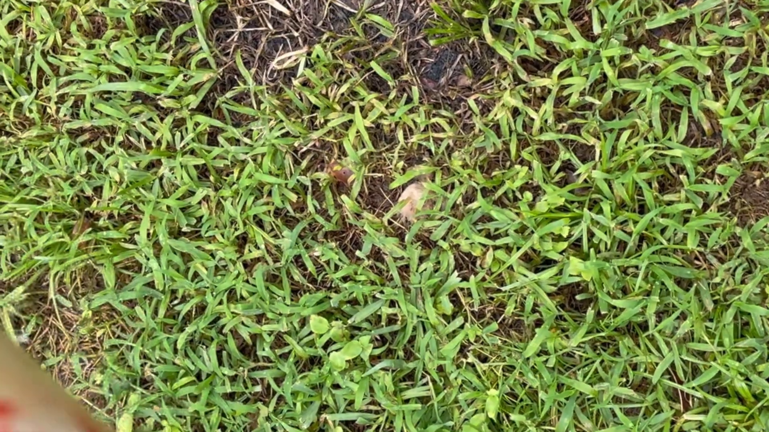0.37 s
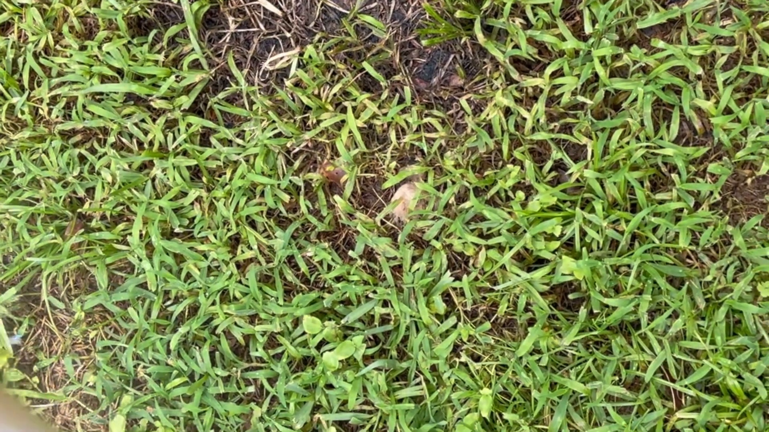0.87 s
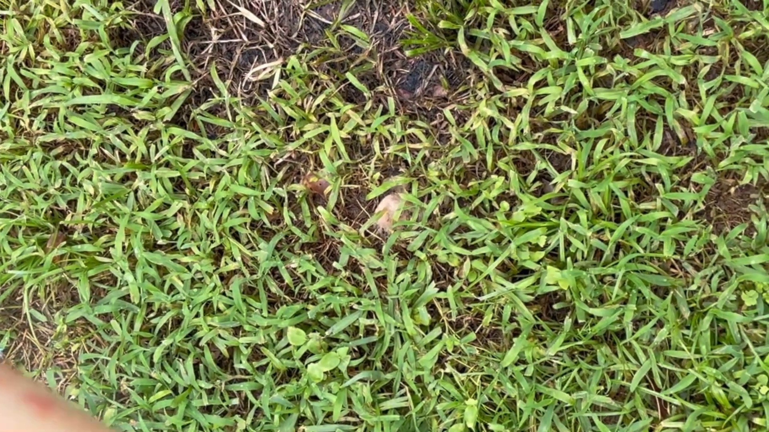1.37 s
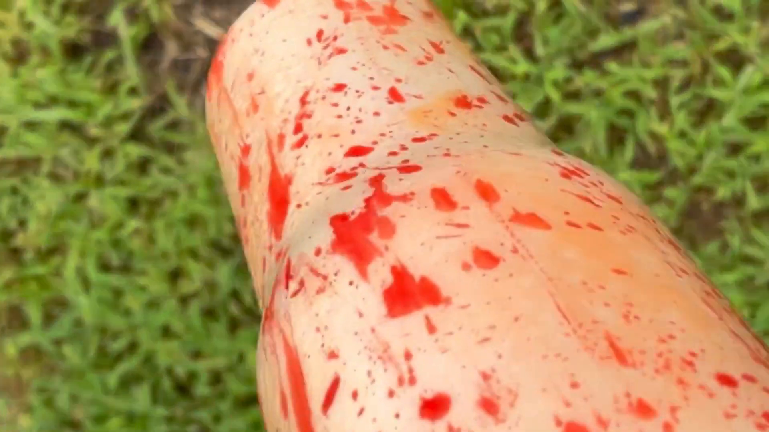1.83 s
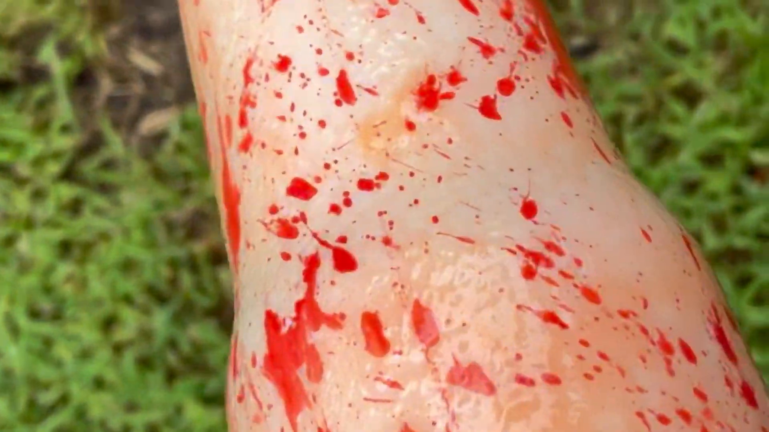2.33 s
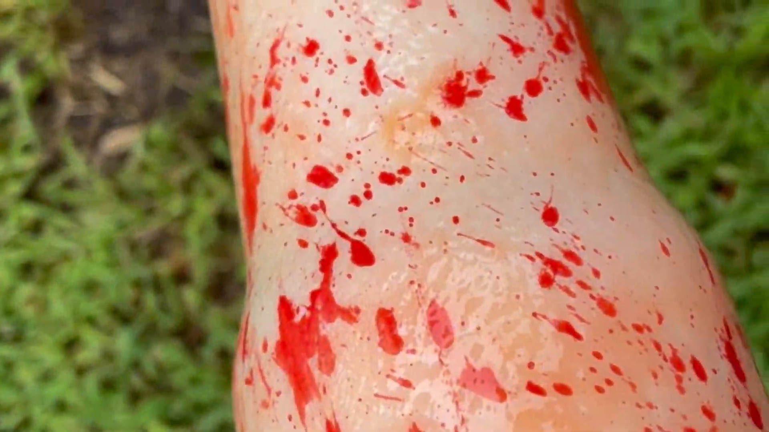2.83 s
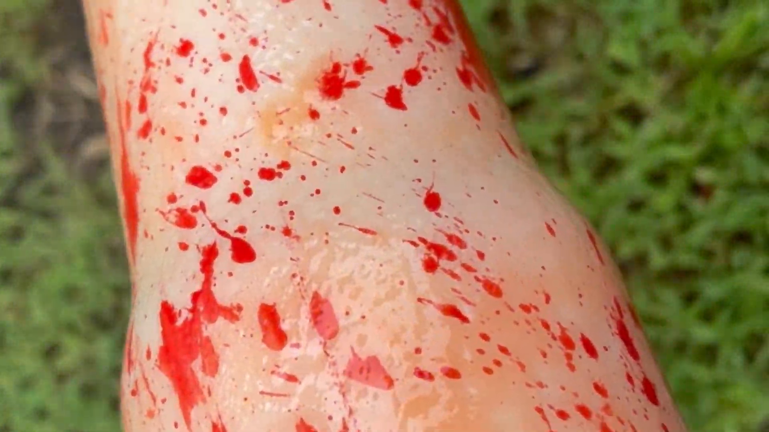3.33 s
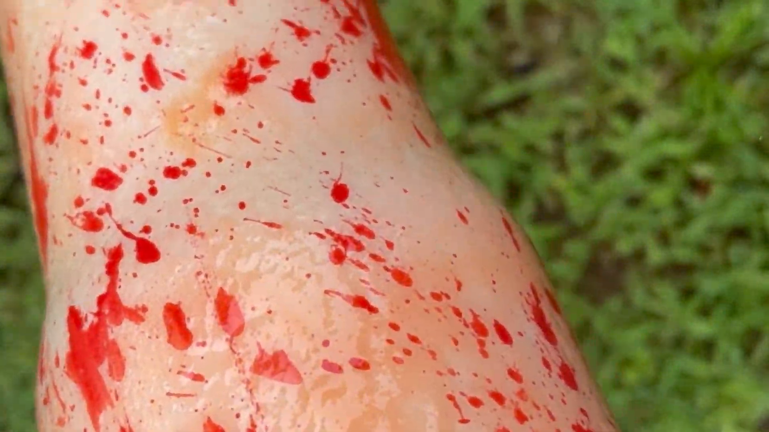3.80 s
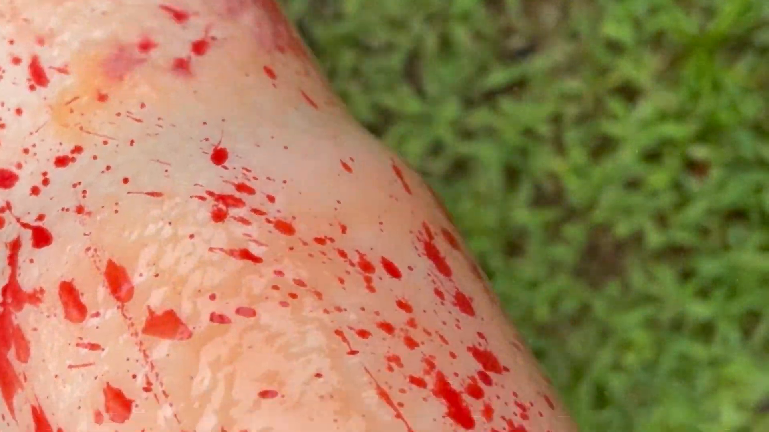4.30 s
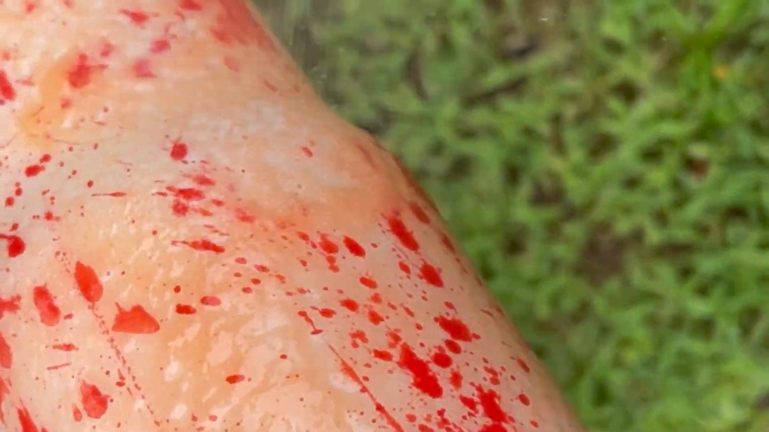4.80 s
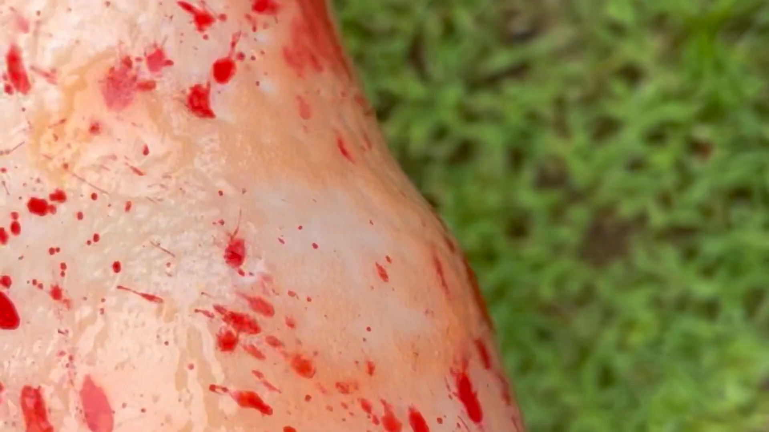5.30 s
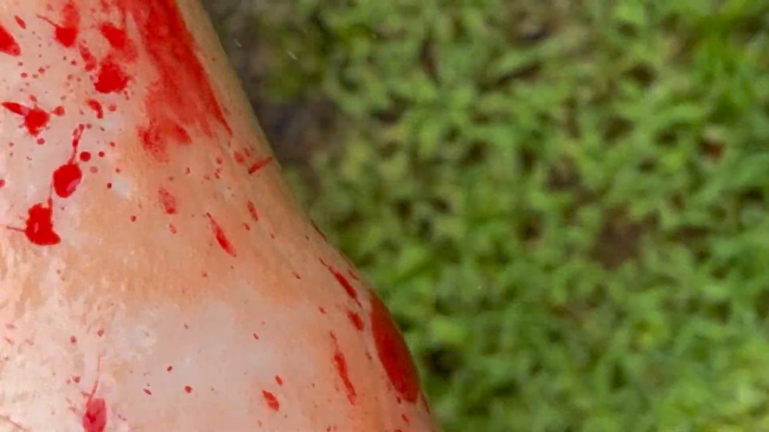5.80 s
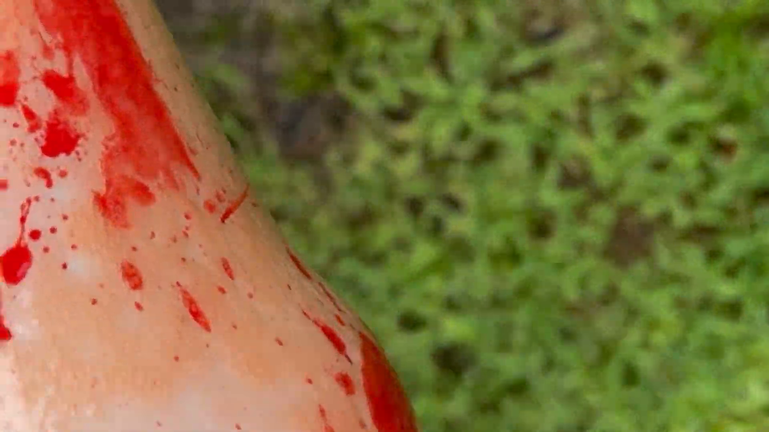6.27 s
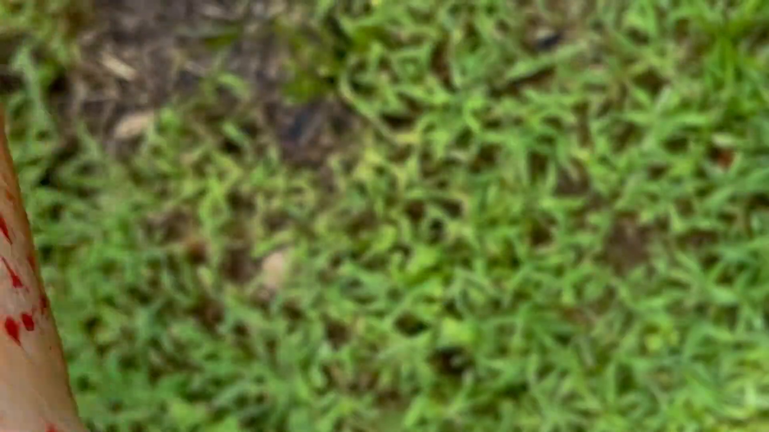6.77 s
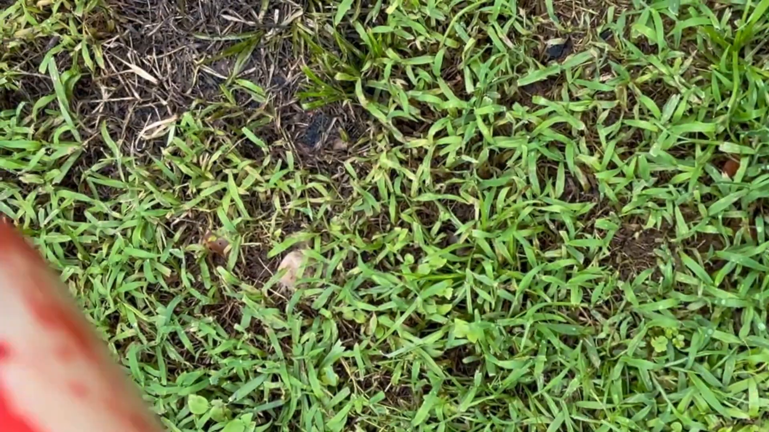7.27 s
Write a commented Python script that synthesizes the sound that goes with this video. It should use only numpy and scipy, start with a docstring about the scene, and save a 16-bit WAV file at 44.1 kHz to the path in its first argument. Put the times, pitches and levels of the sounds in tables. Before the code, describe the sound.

Outdoors on a lawn, an aerosol can sprays close to a small stereo microphone. Two brief hisses come first, then three longer ones, the fourth loudest and swinging in level. Small finger ticks and a faint fizz fill the gaps. After the fifth, skin rubs on the can and it is knocked once with a hollow tinny clack; a sixth burst is still hissing at the end. Far traffic rumbles softly.

```python
"""Outdoors over a lawn, far traffic rumbles under a steady wash, and a faint fizz of filtered noise is in the air.
A finger ticks on the nozzle, then an aerosol can sprays at a held object, close to a small stereo microphone:
six short bursts of turbulent hiss, with moving echoes from hand, can and object, and moving dips. Fizz lingers
after each of the first five; ticks, rubs, decaying sines and soft bumps fall around them. After the fifth the can
is knocked once, a noise crack with decaying sine modes; the sixth burst is still spraying at the end."""
import sys
import numpy as np
from scipy import signal
from scipy.fft import rfft, irfft
from scipy.io import wavfile
from scipy.ndimage import uniform_filter1d

SR = 44100
rng = np.random.default_rng(int(sys.argv[2]) if len(sys.argv) > 2 else 0)


def unload_audio(sound):
    """Save the sound as a 16-bit wav file, at the path given as the first command line argument."""
    columns = np.transpose(np.atleast_2d(sound))
    # keep every value between -1 and 1, then stretch to whole-number steps
    steps = np.round(np.clip(columns, -1, 1) * 32767)
    wavfile.write(sys.argv[1], SR, steps.astype(np.int16))


def voltage_ratio(decibels):
    """Convert decibels (scalar or array-like) to amplitude ratios, 20 dB per decade."""
    exponent = np.asarray(decibels, float) / 20
    return 10 ** exponent


N = 336438
TIME, HZ = np.arange(N) / SR, np.fft.rfftfreq(512, 1 / SR)

# nozzle valve, one row a burst: opens t/s, rise t/ms, shuts t/s, fall t60/ms
VALVE = [(.133, 14, .832, 60), (1.04, 12, 1.466, 55), (2.868, 16, 3.712, 22), (3.99, 6, 4.882, 45),
         (5.288, 12, 6.393, 40), (7.28, 11, 7.7, 50)]
# loudness of the jet as the can swings nearer and away, before a common +4 dB; one table a burst: t/s, level/dB
SWING = [
    [(0.165, -30), (0.401, -29.5), (0.437, -27.5), (0.445, -28.5), (0.563, -30), (0.573, -28.5),
     (0.82, -29.5)],
    [(1.07, -30.5), (1.12, -28.5), (1.352, -30), (1.455, -30)],
    [(2.9, -30), (2.988, -26), (3.306, -27.5), (3.314, -26), (3.618, -27), (3.638, -29.5), (3.7, -27.5)],
    [(4.01, -29.5), (4.06, -23), (4.302, -25.5), (4.496, -21), (4.678, -27.5), (4.774, -23), (4.87, -25)],
    [(5.32, -34.5), (5.324, -29), (5.652, -29.5), (5.756, -26), (5.892, -29.5), (6.024, -27.5), (6.38, -29)],
    [(7.31, -30), (7.362, -28.5), (7.62, -27)],
]
# aim of each burst before swing and waver: splash on the object level/dB, splash tilt/(dB per octave),
# topmost hiss level/dB, left minus right of the low hiss level/dB, scatter that makes the ports differ/0-1
AIM = [(0, -2.1, 5, 5.5, 0.23), (0.9, -1.5, 0, 3, 0.07), (3, 2, 1.5, -.3, 0.07),
       (-0.1, -0.5, -1.5, 0.5, 0.03), (0, 2, -0.5, -.3, 0.53), (-1.3, -2.8, 0, 1.5, 0.3)]
# the two microphone ports: f/Hz, phase by which left leads/rad
PORT_LEAD = [(30, 0), (300, -.15), (850, 1.2), (1700, -.1), (4800, .2), (5400, -1), (6100, -1.7),
             (11500, -2.1), (12500, -2.6), (15500, -3)]
# left-right likeness of the yard's wash and the fizz: f/Hz, likeness/0-1
YARD_SAME = [(60, 0.93), (270, 1), (450, 0.61), (800, 0.11), (1300, 0.12), (2000, 0.81), (3300, 0.68),
             (5000, .6), (8000, 0.47)]


def evened(x):
    """Scales to an rms of 1."""
    return x / np.sqrt(np.mean(np.abs(x) ** 2) + 1e-20)


def read(points, hz=HZ):
    """Reads a table along log frequency, as a column."""
    f, value = np.transpose(points)
    return np.interp(np.log(hz + 1), np.log(f + 1), value)[:, None]


def follow(tables, t):
    """Reads the columns of tables laid end to end at times t."""
    s, *columns = np.vstack(tables).T
    return [np.interp(t, s, column) for column in columns]


def add(mix, s, sound):
    """Lays a sound into the mix at s seconds, cut at the end."""
    part = mix[round(s * SR):][:len(sound)]
    part += sound[:len(part)]


def drift(t, size, count=1):
    """Slow chance of rms 1, smoothed twice over size steps."""
    x = rng.standard_normal((len(t), count))
    for _ in range(2):
        x = uniform_filter1d(x, int(size), axis=0)
    return evened(x).T


def hiss(shape, same, patchy_db, left_db=0., scatter=0., size=512):
    """Random short-time spectra with drifting patches, heard through the two microphone ports."""
    hz, frames = np.fft.rfftfreq(size, 1 / SR), 4 * N // size + 5
    a, b, c, d, patches = rng.standard_normal((frames, len(hz), 5)).T
    patches = uniform_filter1d(patches, size=size // 100, axis=0)
    patches = evened(uniform_filter1d(patches, size=12288 // size, axis=1))
    like = np.clip(read(same, hz) - scatter, 0, 1)
    left, unlike = a + 1j * b, c + 1j * d
    right = like * left + np.sqrt(1 - like ** 2) * unlike
    right = right * np.exp(-1j * read(PORT_LEAD, hz))
    ports = np.array([left * voltage_ratio(left_db / 2), right / voltage_ratio(left_db / 2)])
    spectra = ports * shape * voltage_ratio(patchy_db * patches)
    return evened(signal.istft(spectra, nperseg=size, noverlap=3 * size // 4)[1][:, :N])


def resonant_noise(hz, q, count):
    """White noise through one broad resonance, at rms 1."""
    return evened(signal.lfilter(*signal.iirpeak(hz, q, SR), rng.standard_normal(count)))


def wash():
    """Steady outdoor wash: shaped noise, unlike at the two ports in much of its range."""
    # spectrum: f/Hz, relative level/(dB per Hz)
    spectrum = [(150, -10), (250, -6), (455, -12), (480, -22), (506, -11.5), (578, -13), (634, -11),
                (861, -19.5), (1430, -27.5), (6000, -43.5), (7800, -75), (13200, -120)]
    return voltage_ratio(-55) * hiss(voltage_ratio(read(spectrum)), YARD_SAME, 0.93)


def traffic():
    """Far rumble: low noise, in finer bands, whose level wanders and is lumpy by chance."""
    # spectrum: f/Hz, relative level/(dB per Hz)
    spectrum = [(12, -41), (20, -53), (44, -6.5), (70, 1.5), (102, -4.5), (155, -4.5), (200, -15.5),
                (236, -16), (300, -26.5), (390, -63), (660, -120)]
    # left-right likeness: f/Hz, likeness/0-1
    alike = [(30, .92), (300, .9)]
    # level course, before the lumps and a common +0.88 dB: t/s, level/dB
    course = [(0.0, -46), (2.61, -43), (4.04, -46), (4.12, -37.5), (4.16, -40.5), (5.18, -44),
              (5.23, -34.5), (5.31, -49), (5.35, -37.5), (5.72, -48), (6.01, -41.5), (6.16, -47),
              (7.59, -41.5), (7.63, -51)]
    low = hiss(voltage_ratio(read(spectrum, np.fft.rfftfreq(4096, 1 / SR))), alike, 1.0, size=4096)
    lumps_db = 0.95 * drift(TIME, 0.067 * SR)[0]
    return low * voltage_ratio(follow([course], TIME)[0] + lumps_db + 0.88)


def bumps():
    """Bumps of wind or hand on the microphone: about two turns of a low sine that swells and fades."""
    # bumps: t/s, peak level/dB, f/Hz
    thumps = [(1.99, -31, 68), (4.101, -27.5, 75), (5.211, -34, 176), (5.219, -25.5, 65.6),
              (5.351, -28, 65), (6.988, -31, 67)]
    out = np.zeros(N)
    for s, db, hz in thumps:
        turns = np.arange(0, 2.2, hz / SR)
        add(out, s - 1 / hz, voltage_ratio(db) * np.hanning(len(turns)) * np.sin(2 * np.pi * turns))
    return out


def fizz():
    """Faint fine hiss left over after a burst, probably the wet coat and the dripping nozzle."""
    # fizz from the outset, then after five bursts: start t/s, level/dB, fading/(dB per s), tilt/(dB per octave)
    drips = [(0, -59.5, -3, 7.5), (.832, -62, 3, 5.5), (1.466, -60, 4, 4.5), (3.712, -57, 8, 6),
             (4.882, -52, 12.5, 8.5), (6.393, -62, 1, 7)]
    # spectrum before the tilt: f/Hz, relative level/(dB per Hz)
    spectrum = [(880, -47), (1500, -17.5), (1960, -2), (2200, -25), (2370, -23), (2920, -6), (3400, -13),
                (5110, -18.5), (7500, -3), (11000, -14.5), (14300, -40.5), (22000, -120)]
    t, f = np.arange(N // 128 + 5) * 128 / SR, HZ[:, None]
    rows = np.array(drips)
    latest = np.maximum(np.searchsorted(rows[:, 0], t) - 1, 0)
    starts, start_db, fade_db, tilt_db = rows[latest].T
    age = np.maximum(t - starts, 0)
    level_db = start_db - fade_db * age
    # the treble edge is set from the level; after a burst it starts higher and draws back
    edge_hz = 10908 + 90 * (level_db + 58.5) + 1200 * np.exp(-age / 0.13) * (starts > 0)
    shape = voltage_ratio(read(spectrum) + tilt_db * np.log2((f + 1) / 8000))
    shape = shape / (1 + np.exp((f - edge_hz) / 110))
    shape = shape / np.sqrt(np.mean(shape ** 2, axis=0))
    return hiss(shape, YARD_SAME, 1.2) * voltage_ratio(np.interp(TIME, t, level_db))


def ticks(out, t):
    """Fingers on nozzle and can: short puffs of noise with a broad ring."""
    # ticks before a common factor of 0.58: t/s, starting noise level/dB, ring f/Hz
    touches = [(0.066, -37, 8000), (1.7848, -46, 3950), (1.8047, -45, 5030), (1.819, -43, 3960),
               (1.9939, -48, 7100), (1.6, -55, 4000), (2.36, -56, 3400), (2.7324, -48.5, 7300),
               (2.8214, -44, 9180), (3.7983, -41, 8000), (3.933, -43, 7710), (3.9584, -42, 9990),
               (4.932, -38, 5000), (6.4054, -40, 10200), (6.665, -54, 7160), (6.7064, -51, 7850),
               (6.8156, -51, 4000), (7.1446, -38.5, 8550)]
    t60_ms = 10.7
    for s, db, hz in touches:
        add(out, s, 0.58 * voltage_ratio(db - 60000 * t / t60_ms) * resonant_noise(hz, 1.6, len(t)))


def rubs(out, t):
    """Skin sliding on the can: noise around 5500 Hz that swells and fades."""
    # rubs: t/s, noise level at the height of the swell/dB, length t/ms
    rustles = [(1.74, -66, 100), (1.78, -61, 50), (6.8, -62, 130), (6.845, -55, 18), (6.868, -53, 23),
               (6.9, -57, 31), (6.931, -74, 170), (6.999, -58, 54)]
    for s, db, ms in rustles:
        swell = np.sin(np.pi * np.minimum(t * 1000 / ms, 1))
        add(out, s, voltage_ratio(db) * resonant_noise(5500, .7, len(t)) * swell)


def decaying_sines(out, t):
    """Single decaying sines with a 1.2 ms onset: rings with the ticks, and a burble during the fifth burst."""
    # sines: t/s, level before onset and decay/dB, f/Hz, t60/ms
    sines = [(.066, -50, 1950, 34), (0.066, -36, 7000, 28), (1.785, -53, 1150, 34),
             (1.806, -53.5, 1170, 50), (1.82, -46.5, 1140, 41), (1.994, -54, 3780, 23),
             (2.36, -61.5, 3350, 25), (3.932, -40, 7740, 34), (6.11, -41.5, 1134, 220)]
    for s, db, hz, t60_ms in sines:
        onset = np.minimum(t / 0.0012, 1)
        add(out, s, voltage_ratio(db - 60000 * t / t60_ms) * np.sin(2 * np.pi * hz * t) * onset)


def knock(out, t):
    """One knock on the can: a bright crack, then the modes of the tin and a thud build up and die."""
    # the knock before onset and decay: t/s, crack level/dB, ring level/dB, thud level/dB
    blow = (6.8945, -27, -39, -40)
    # modes of the tin, relative to the ring level: f/Hz, level/dB, t60/s
    modes = [(357.5, 6.5, 0.14), (754, 0.5, 0.13), (980, 9.5, 0.063), (1170, -8, 0.076), (1950, 2, 0.035),
             (3871, -14, .04), (6840, 14.5, 0.034), (9400, -12, .03)]
    s, crack_db, ring_db, thud_db = blow
    tin = sum(voltage_ratio(db - 60 * t / t60) * np.sin(2 * np.pi * hz * t) for hz, db, t60 in modes)
    crack = np.diff(rng.standard_normal(len(t) + 1))  # differencing brightens the noise
    crack = crack * voltage_ratio(crack_db - 60 * t / 0.041) * np.minimum(t / 0.00055, 1)
    thud = resonant_noise(650, .9, len(t)) * voltage_ratio(thud_db - 60 * t / 0.065)
    add(out, s, crack + (voltage_ratio(ring_db) * tin + thud) * (1 - np.exp(-t / 0.0062)))


def handling():
    """The small sounds, low-passed at 10500 Hz; the right port hears them with a shifted phase."""
    out, t = np.zeros(N), np.arange(8000) / SR
    for small_sound in (ticks, rubs, decaying_sines, knock):
        small_sound(out, t)
    out = signal.sosfilt(signal.butter(12, 10500, fs=SR, output="sos"), out)
    lead = read(PORT_LEAD, np.fft.rfftfreq(N, 1 / SR))[:, 0]
    return np.array([out, irfft(rfft(out) * np.exp(-1j * lead), N)])


def valve():
    """Flow through the nozzle, 0-1: a weak start that swells fast, and a quick fall once the finger lifts."""
    flow = np.zeros(N)
    for opens, rise_ms, shuts, fall_ms in VALVE:
        rise = np.clip((TIME - opens) * 1000 / rise_ms, 0, 1) ** 1.5
        flow += rise * voltage_ratio(-60000 * np.maximum(TIME - shuts, 0) / fall_ms)
    return flow


def burst_at(t):
    """Number of the burst at each time; a burst's settings take over 50 ms before it opens."""
    return np.maximum(np.searchsorted(np.array(VALVE)[:, 0] - .05, t) - 1, 0)


def burst_mean(tables, t):
    """Mean of the second column of the table of the burst at each time."""
    return np.array([np.mean(rows, axis=0)[1] for rows in tables])[burst_at(t)]


def nearness(t):
    """How far (dB) the jet swells above its burst's mean as the can comes near."""
    return follow(SWING, t)[0] - burst_mean(SWING, t)


def spray_colour(hz, t):
    """Spectrum (dB) of the jet: splash and topmost hiss change with aim, nearness and an unsteady hand."""
    # jet: f/Hz, relative level/(dB per Hz)
    spectrum = [(240, -27), (400, -17.5), (799, -15), (1040, -20), (1140, -17), (1980, -15), (3090, -10),
                (4910, -8.5), (5550, -8), (6890, -1), (9960, 3.5), (11100, -0.5), (12700, -10.5),
                (14600, -22.5), (15800, -26)]
    # splash: f/Hz, share that follows the splash
    splash_share = [(300, 1), (1200, 0.51), (3200, 0.77), (5500, 0.32), (7500, 0)]
    # topmost hiss: f/Hz, share that follows it
    top_share = [(9500, 0.17), (12500, 1)]
    splash_db, tilt_db, top_db, _, _ = np.array(AIM)[burst_at(t)].T
    near_db, waver_db = nearness(t), -0.22 * drift(t, 8, count=3)
    tilt_db = tilt_db - 0.92 * near_db + waver_db[0] / 2
    octaves = np.clip(np.log2((hz[:, None] + 1) / 2500), -1, 1)
    splash_db = splash_db - 0.38 * near_db + waver_db[1] + tilt_db * octaves
    top_db = top_db + 0.1 * near_db + waver_db[2]
    return read(spectrum, hz) + read(splash_share, hz) * splash_db + read(top_share, hz) * top_db


def echo_and_dips(f, t):
    """Moving gain: an echo adds a ripple, and three moving dips are cut into the spectrum."""
    # one table a burst: t/s, first dip f/Hz, its depth before flicker/dB
    first_dips = [
        [(.155, 4740, 22), (.27, 4750, 34), (.39, 4830, 22), (.44, 4300, 6), (.52, 4170, 24), (.6, 4500, 28),
         (.65, 4000, 6), (.71, 3830, 24), (.83, 4000, 8)],
        [(1.06, 4010, 18), (1.16, 3960, 32), (1.3, 4220, 28), (1.46, 4500, 8)],
        [(2.89, 4260, 22), (2.99, 4310, 26), (3.14, 4690, 8), (3.24, 4640, 45), (3.31, 4580, 55),
         (3.38, 4650, 6), (3.6, 4690, 10), (3.71, 4610, 22)],
        [(4.01, 4400, 10), (4.1, 4010, 22), (4.19, 3960, 27), (4.28, 4500, 14), (4.39, 4080, 36),
         (4.47, 3650, 16), (4.56, 4020, 34), (4.68, 4450, 12), (4.8, 3900, 34)],
        [(5.31, 3960, 30), (5.57, 3900, 30), (5.73, 3550, 26), (5.82, 3830, 38), (5.9, 3900, 16),
         (5.98, 3790, 28), (6.08, 3830, 12), (6.19, 3960, 34), (6.385, 3550, 10)],
        [(7.3, 2970, 16), (7.41, 2970, 18), (7.5, 2890, 34), (7.62, 3190, 27)],
    ]
    # one row a burst, before the slide: high dip f/Hz, echo delay t/us, echo share, further share of its dull part
    echoes = [(10630, 642, 0.12, 0.064), (6650, 523, .1, 0.039), (11600, 284, 0.17, 0.016),
              (9350, 450, 0.12, 0.25), (6320, 478, 0.065, 0.15), (6527.8, 465, 0.098, 0.48)]
    # second dip of each burst, before slide and flicker: f/Hz, depth/dB
    second_dips = [(5150, 9), (5650, 30), (5600, 7), (5150, 8), (5070, 30), (5480, 26)]
    # width of the first, second and high dip: f/Hz
    widths_hz = [95, 95, 350]
    burst = burst_at(t)
    first_hz, first_db = follow(first_dips, t)
    # the second dip moves partly with the first; the high dip and the echo delay move inversely
    slide = (first_hz / burst_mean(first_dips, t)) ** 0.45
    high_hz, delay_us, share, dull = np.array(echoes)[burst].T
    second_hz, second_db = np.array(second_dips)[burst].T
    share = share + dull / (1 + (f / 2530) ** 4)  # the dull part is halved at 2530 Hz
    gain = np.abs(1 + share * np.exp(-2j * np.pi * f * delay_us / slide / 10 ** 6))
    wobble, flicker = 1 + .007 * drift(t, 8, count=3), 1 + .3 * drift(t, 4, count=3)
    dips = [(first_hz, first_db), (second_hz * slide, second_db), (high_hz / slide, 4.5)]
    for k, (dip_hz, depth_db) in enumerate(dips):
        depth_db = depth_db * np.maximum(flicker[k], 0)
        gain = gain / voltage_ratio(depth_db / (1 + ((f - dip_hz * wobble[k]) / widths_hz[k]) ** 2))
    return gain


def stray_dips(f, t):
    """Depth (dB) of 110 brief narrow dips at chance times and frequencies, up to 30 dB each."""
    when, where, deep = rng.random((110, 3)).T
    dip_hz = np.interp(where, (0, 1), (3500, 5600))
    across = 1 / (1 + ((f - dip_hz) / 55) ** 2)
    along = np.exp(-((t - when[:, None] * N / SR) / .045) ** 2)
    return (across * 30 * deep ** 2) @ along


def jet():
    """Turbulent noise from the nozzle, coloured by aim, echo and dips, gated by the valve, louder as it nears."""
    # left-right balance: f/Hz, share that follows it
    sideways = [(400, -0.5), (900, 2.5), (2000, 0.9), (3500, 0.011)]
    # left-right likeness before scatter: f/Hz, likeness/0-1
    alike = [(300, 0.97), (800, 0.61), (1800, 1), (4500, 0.86), (5300, 0.96), (6500, 1), (11000, 0.99),
             (14000, 0.66)]
    # scatter: f/Hz, share that follows it
    scatter_share = [(1200, 0.41), (1950, 0.021), (2300, 1), (4800, 0.38), (6000, 0.17)]
    hz, t = np.fft.rfftfreq(1024, 1 / SR), np.arange(N // 256 + 5) * 256 / SR
    f = hz[:, None]
    # broad bands of the hiss swell and fade by chance
    patches_db = 1.64 * evened(uniform_filter1d(drift(t, 18, count=len(hz)), 14, axis=0))
    shape = voltage_ratio(spray_colour(hz, t) - stray_dips(f, t) + patches_db) * echo_and_dips(f, t)
    _, _, _, left_db, scatter = np.array(AIM)[burst_at(t)].T
    left_db = read(sideways, hz) * (left_db + .3 * nearness(t))
    scatter = read(scatter_share, hz) * np.clip(scatter, 0, 1)
    spray = hiss(shape, alike, 1.25, left_db, scatter, size=1024)
    spit_db = 0.43 * evened(uniform_filter1d(rng.standard_normal(N), size=180))  # droplets leave unevenly
    return spray * valve() * voltage_ratio(follow(SWING, TIME)[0] + spit_db + 4.0)


def scene():
    """The yard, the fizz, the small sounds and the spray together at the microphone."""
    return wash() + traffic() + bumps() + fizz() + handling() + jet()


def roll_off(x):
    """The treble ends steeply here."""
    return signal.sosfilt(signal.butter(12, 15950, fs=SR, output="sos"), x)


def record(dry):
    """Takes the finished mix as it stands at the microphone."""
    return roll_off(dry)


dry = scene()
out = record(dry)
unload_audio(out)
```